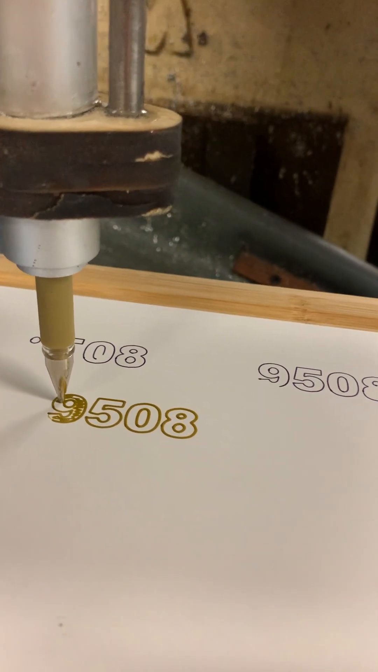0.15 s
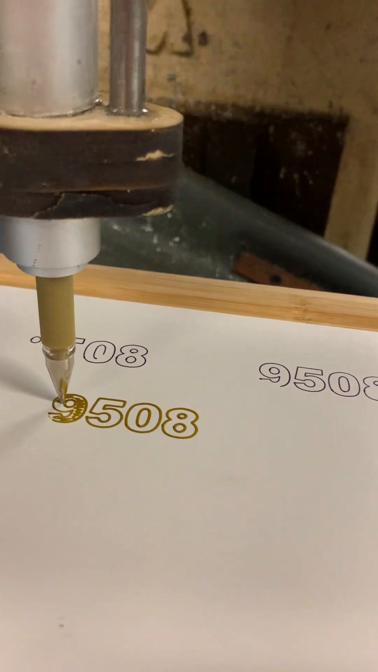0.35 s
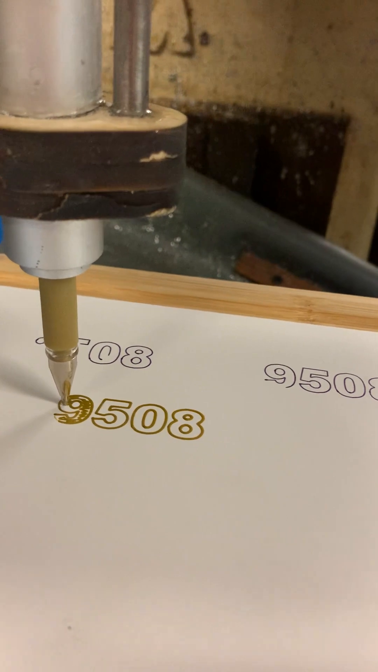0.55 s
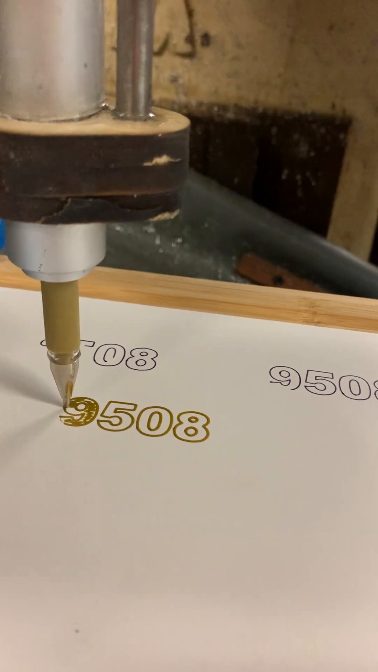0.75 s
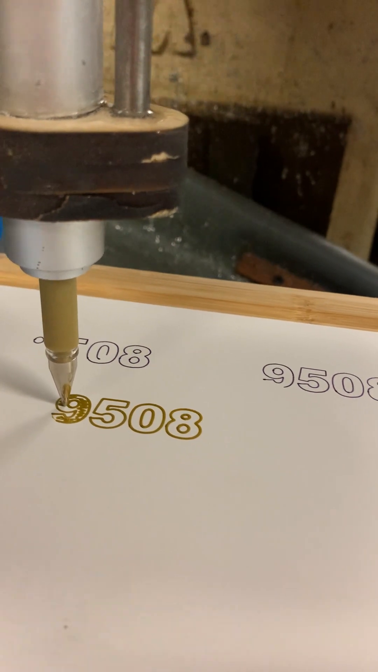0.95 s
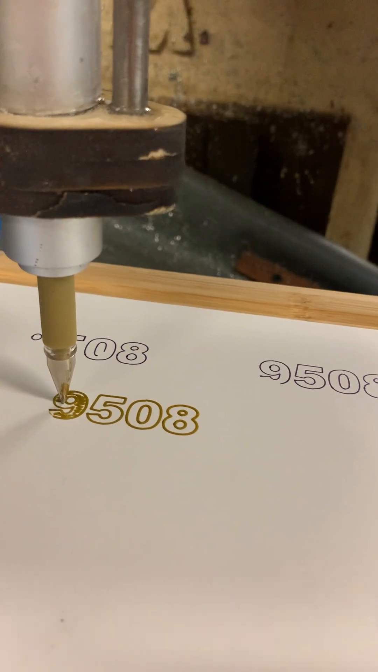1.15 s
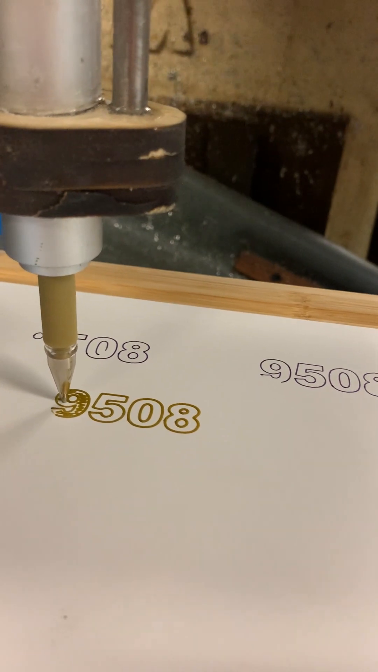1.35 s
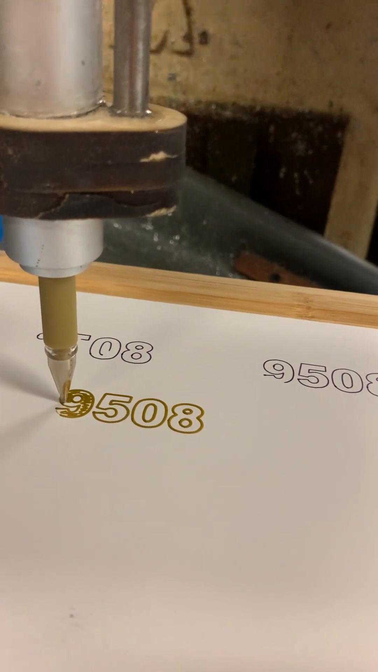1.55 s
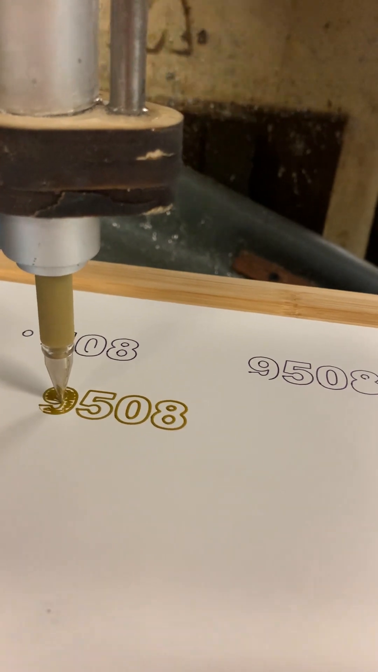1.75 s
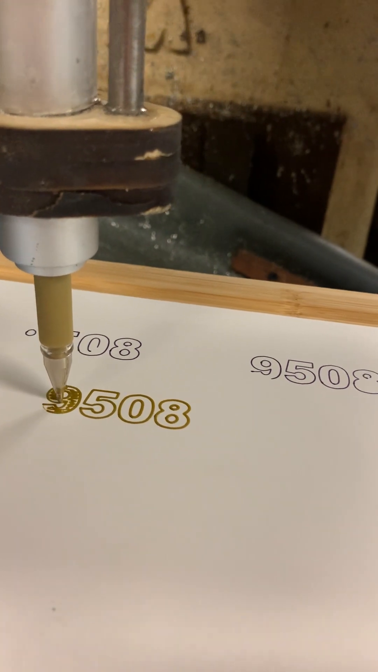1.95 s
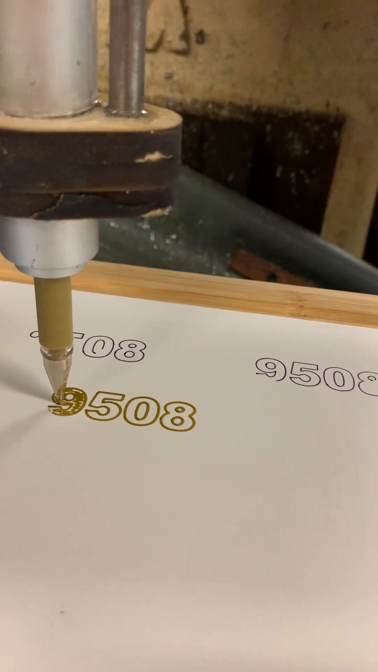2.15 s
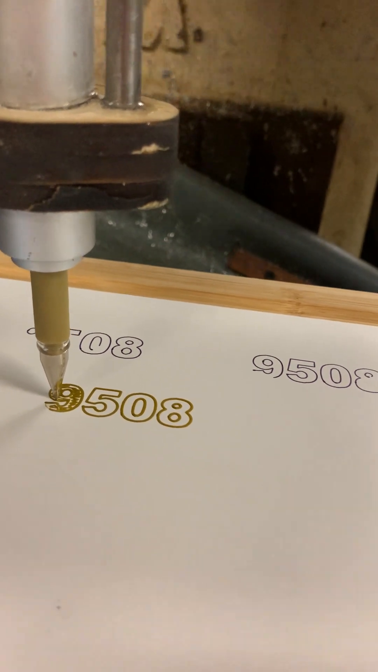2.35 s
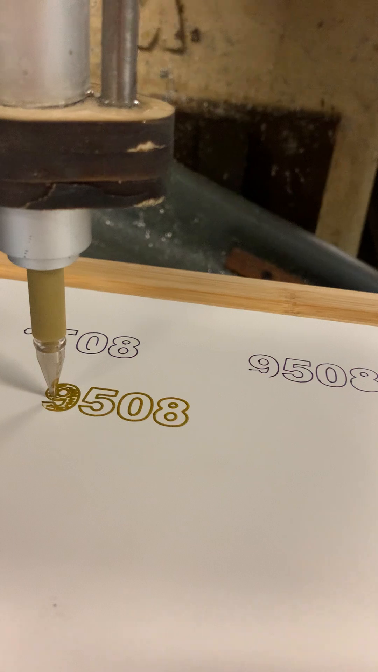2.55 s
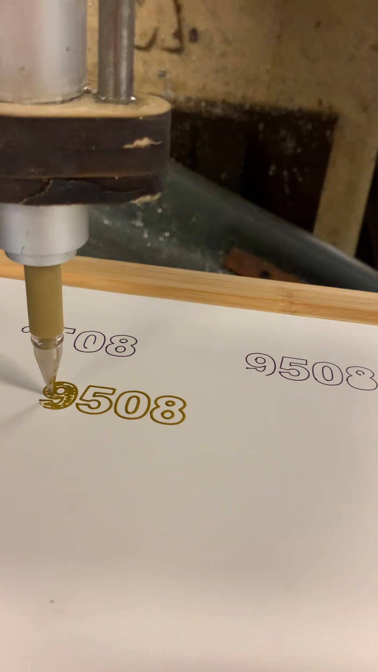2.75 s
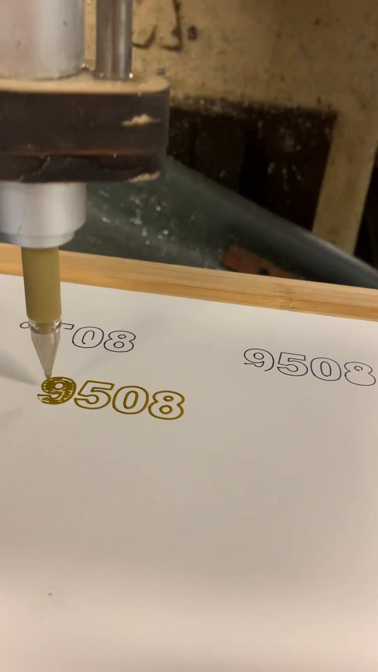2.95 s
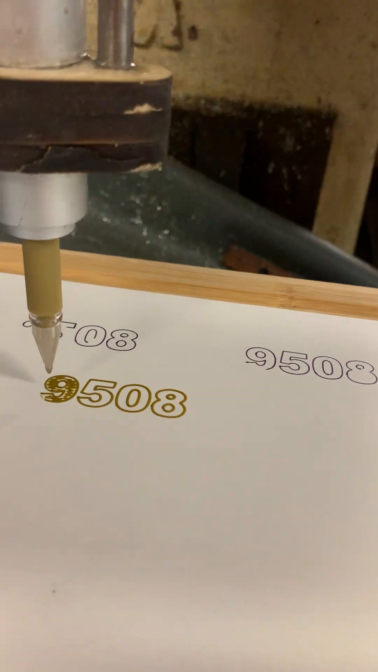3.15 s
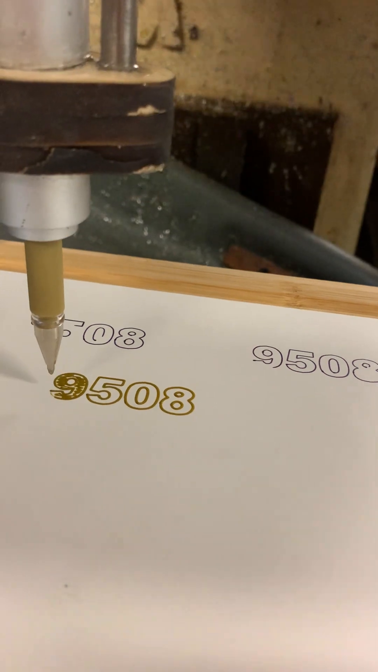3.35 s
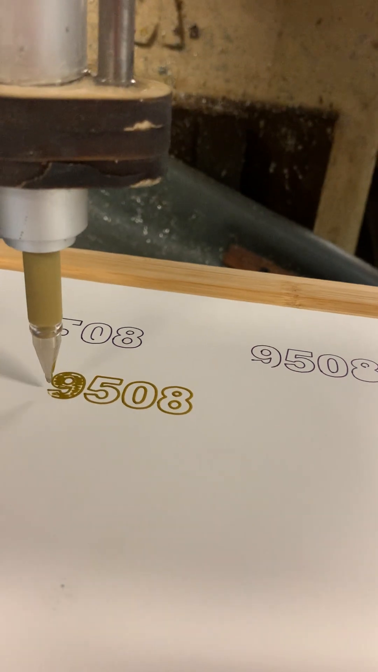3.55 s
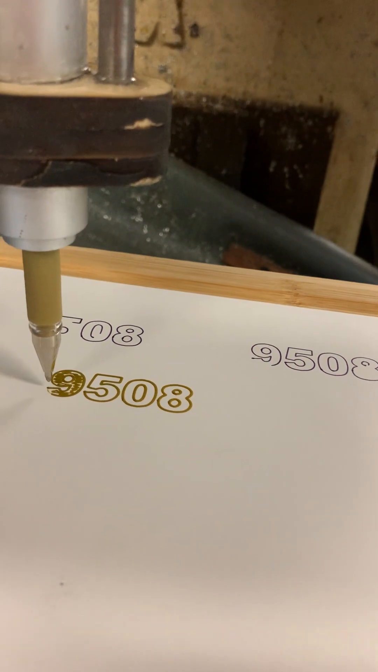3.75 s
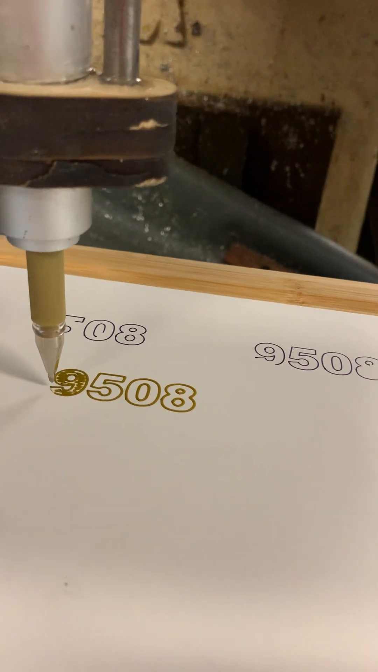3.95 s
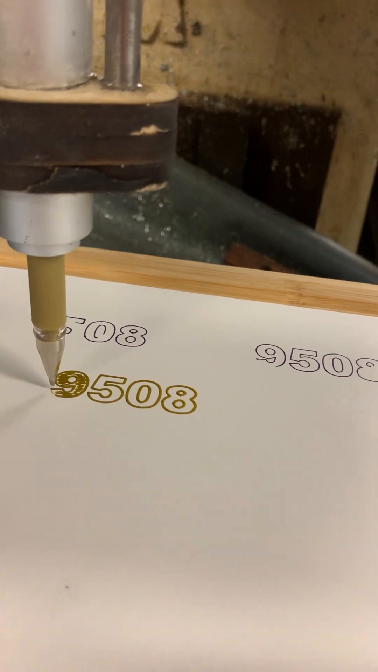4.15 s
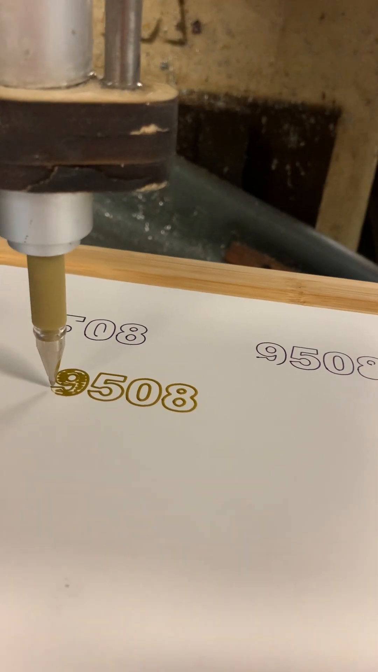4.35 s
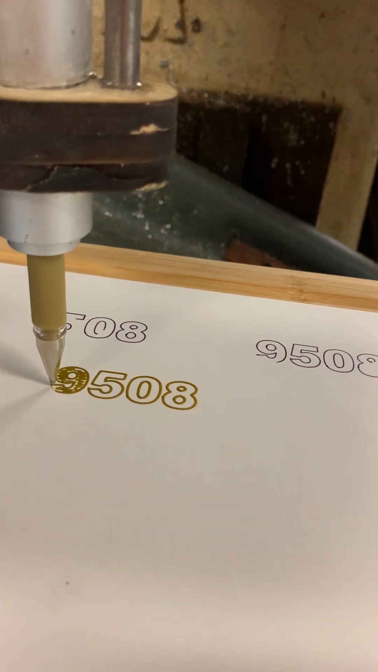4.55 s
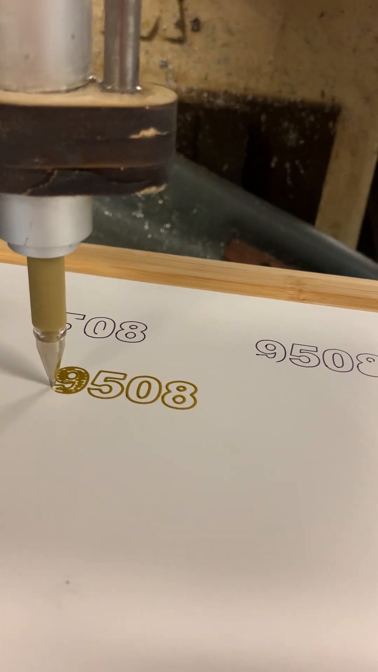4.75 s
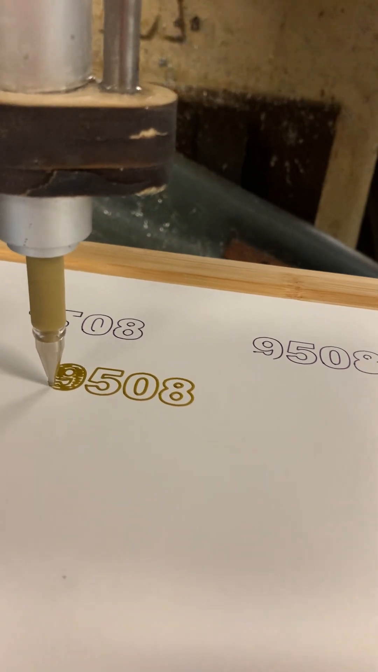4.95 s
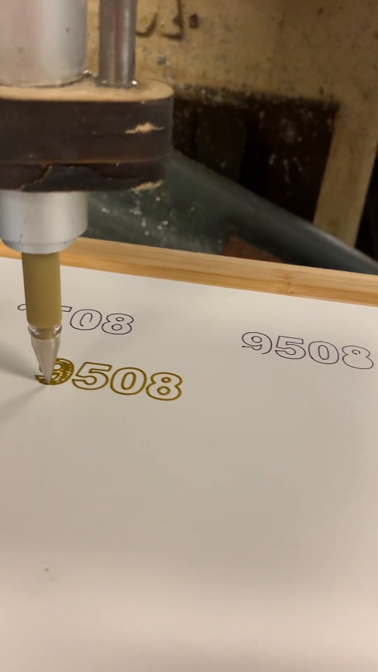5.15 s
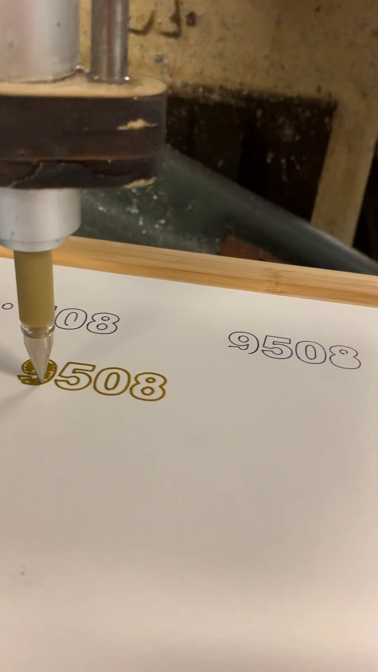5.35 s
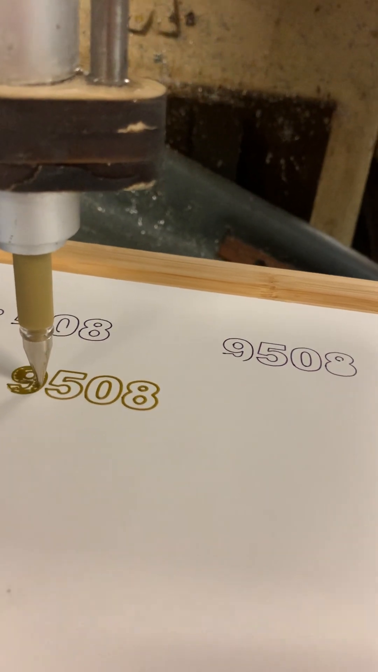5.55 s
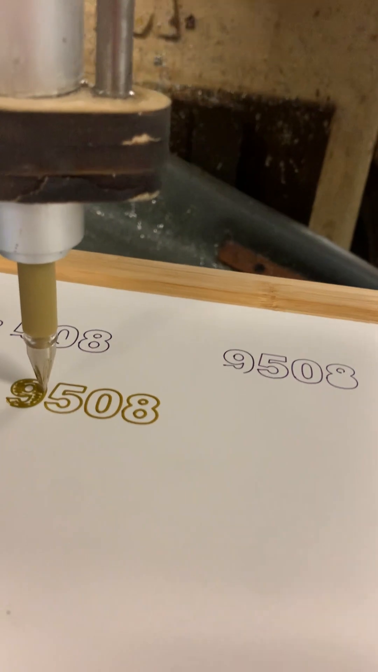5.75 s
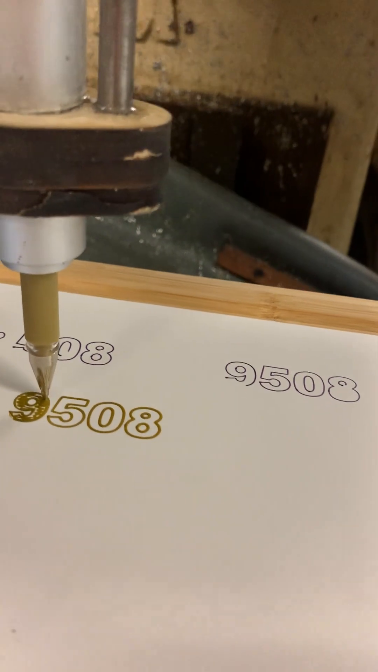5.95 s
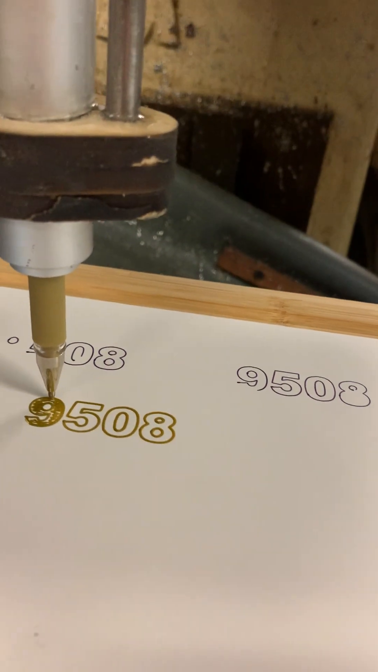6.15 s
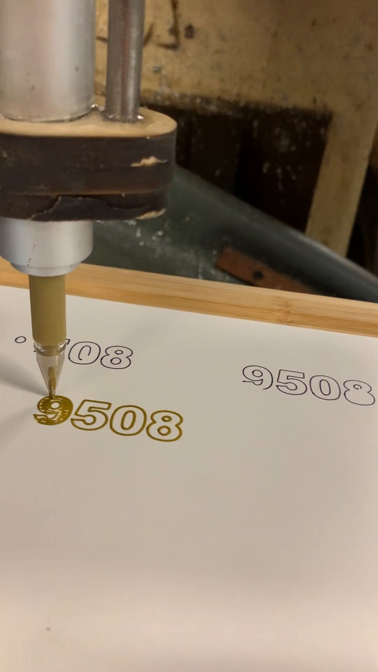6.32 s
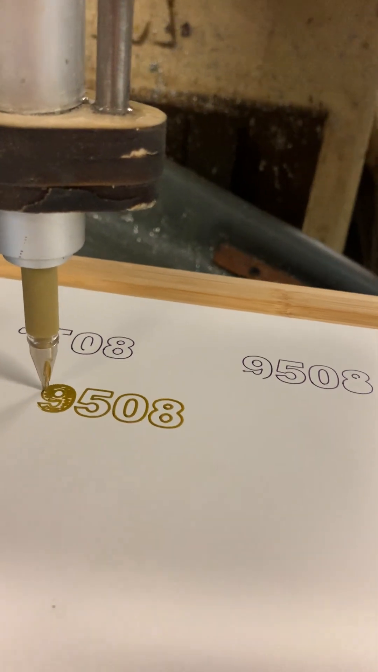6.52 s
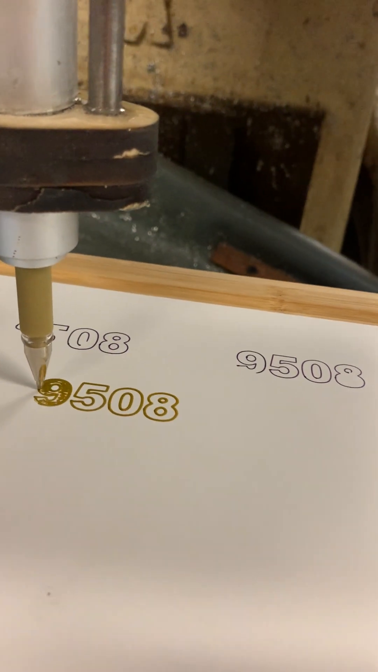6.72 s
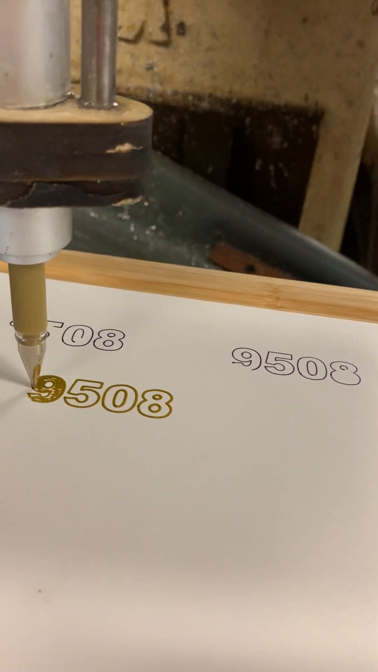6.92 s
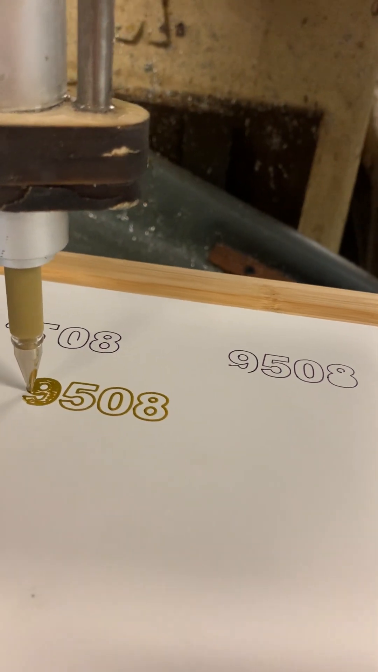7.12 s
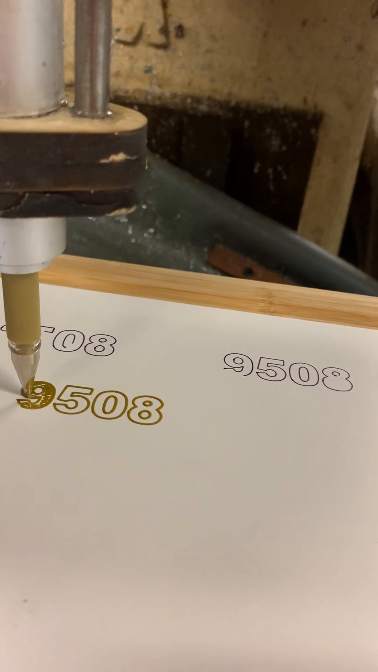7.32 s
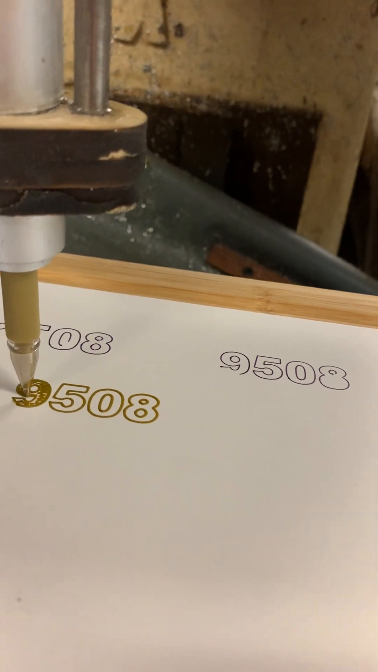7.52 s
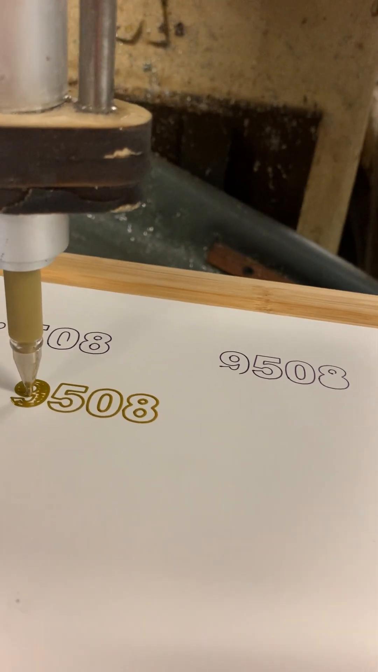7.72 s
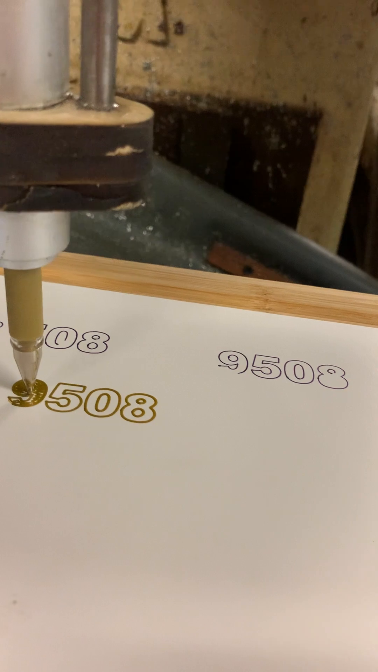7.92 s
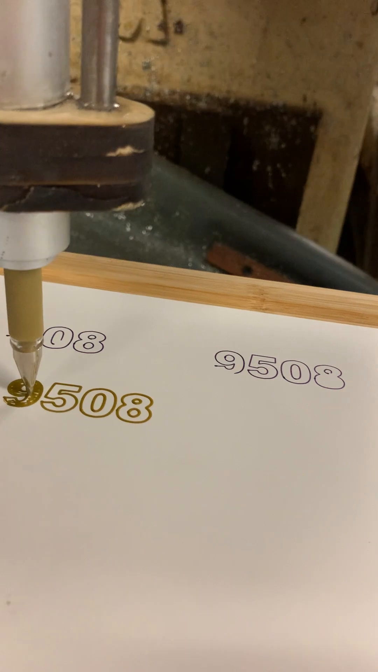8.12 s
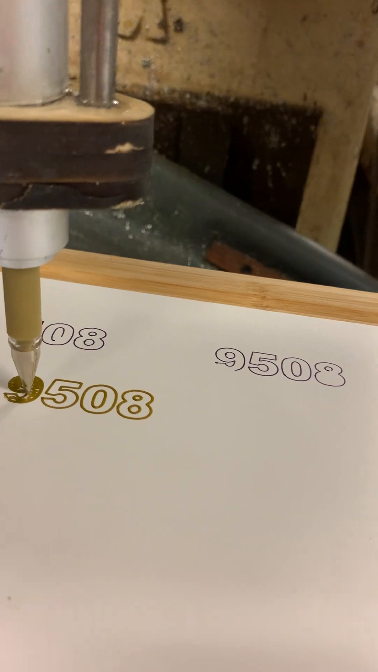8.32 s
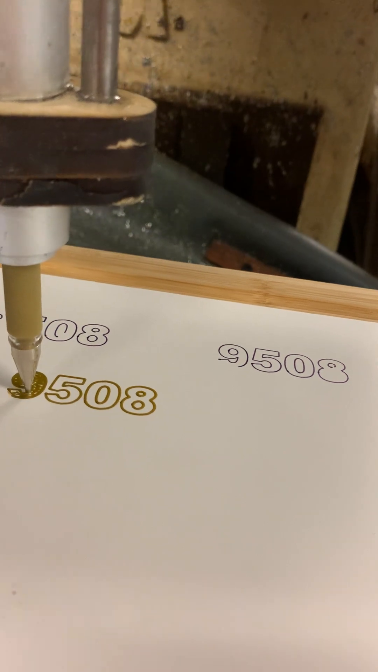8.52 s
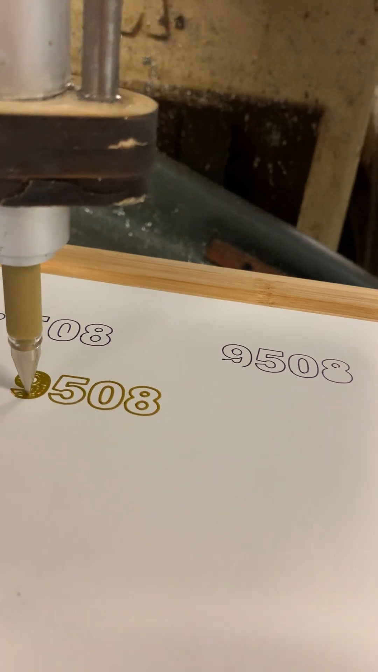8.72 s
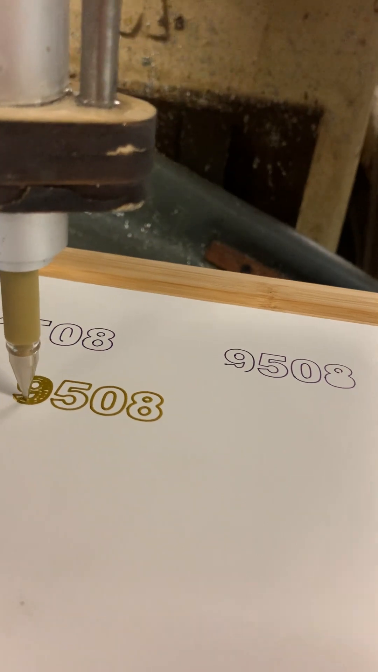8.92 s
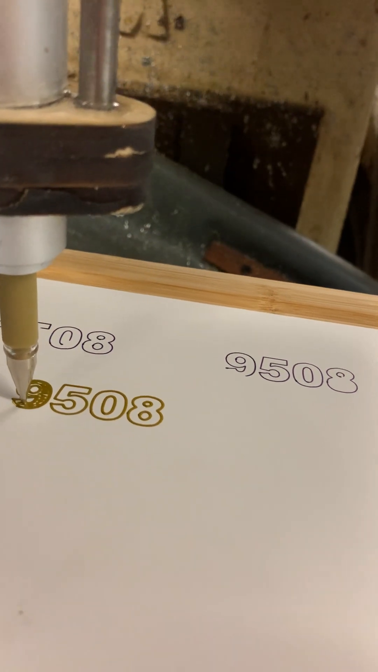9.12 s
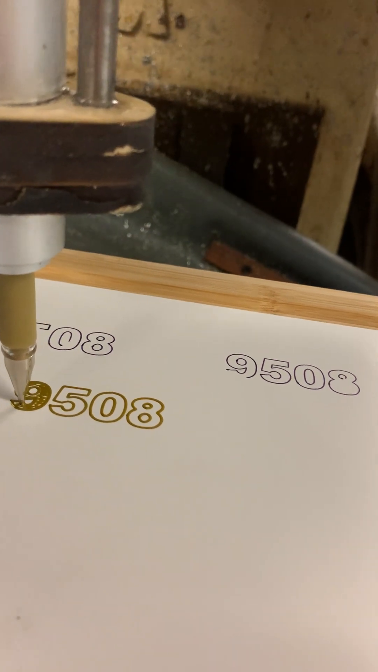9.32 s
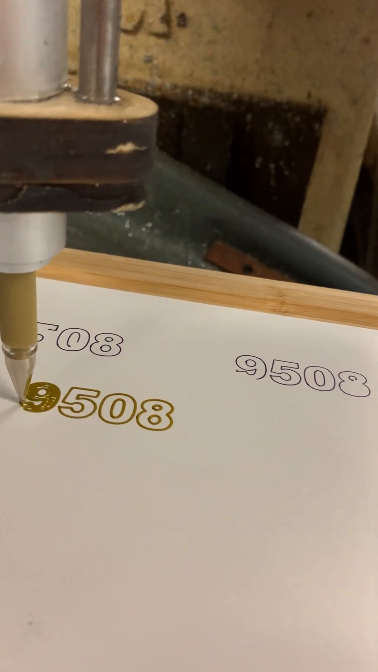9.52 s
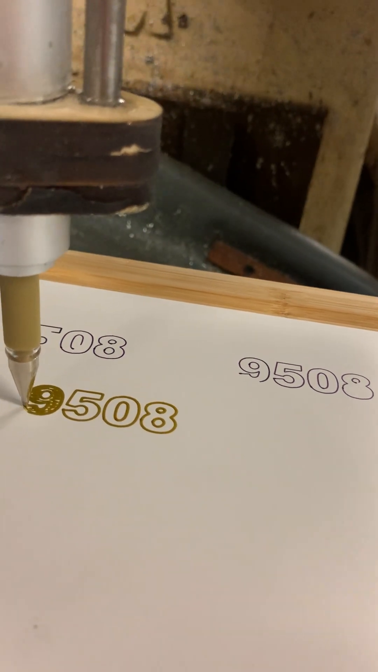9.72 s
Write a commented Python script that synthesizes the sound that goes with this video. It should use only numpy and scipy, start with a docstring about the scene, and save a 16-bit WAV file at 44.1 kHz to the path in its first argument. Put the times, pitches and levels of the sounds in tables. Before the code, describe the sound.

Over a rumbling fan, a small drawing machine whines faintly, clicks and knocks, rasping twice as its pen lifts and drops.

```python
"""A small pen plotter fills in digits on a board, heard from close by in a quiet workshop.
Its motors whine faintly, the pen hisses as it rubs, the carriage knocks when it reverses,
fast moves shake the frame and the gearing ticks. The pen axis lifts and drops with two loud rasps
in its metal guide. A fan rumbles all along. Two microphone ports hear it out of phase."""
import sys
import numpy as np
from scipy import signal
from scipy.fft import rfft, irfft
from scipy.io import wavfile

SR = 44100
rng = np.random.default_rng(int(sys.argv[2]) if len(sys.argv) > 2 else 0)


def unload_audio(sound):
    """Save the sound as a 16-bit wav file, at the path given as the first command line argument."""
    columns = np.transpose(np.atleast_2d(sound))
    # keep every value between -1 and 1, then stretch to whole-number steps
    steps = np.round(np.clip(columns, -1, 1) * 32767)
    wavfile.write(sys.argv[1], SR, steps.astype(np.int16))


N = 431277
TIME = np.arange(N) / SR
HZ = np.maximum(np.fft.rfftfreq(N, 1 / SR), 1)

# The pen axis sliding in its guide. Each row: start of full speed and hold in seconds, treble hiss in dB,
# lower and top hiss in dB above the treble, start in seconds and level in dB of the whine's surge.
SLIDES = [(2.868, 0.17, -38, -2.5, 1.8, 2.876, -43.5), (3.436, 0.14, -36.5, -5, -1.1, 3.42, -57)]
SLIDE_RISE, SLIDE_FALL = 3400, 960  # dB per second


def from_db(db):
    """Decibels to gain."""
    return 10 ** (np.asarray(db) / 20)


def rms_one(x):
    """Scale to rms 1."""
    return x / np.sqrt(np.mean(x ** 2) + 1e-20)


def in_time(rows):
    """One automation curve for each column after the time in seconds."""
    seconds, *columns = np.transpose(rows)
    return [np.interp(TIME, seconds, column) for column in columns]


def at_hz(points):
    """A curve across the spectrum, joining the points over log frequency."""
    hz, values = np.transpose(points)
    return np.interp(np.log(HZ), np.log(hz), values)


def swell(start, held, rise, fall):
    """Envelope in dB: rises to 0 at start, holds, then falls; slopes in dB per second."""
    t = TIME - start
    return np.minimum(0, np.minimum(rise * t, fall * (held - t)))


def drift(rate_hz):
    """Smooth random modulation with an rms of about 1: noise through two one-pole low-passes."""
    step, run_in = 40, 2000
    pole = np.exp(-2 * np.pi * rate_hz * step / SR)
    noise = rng.standard_normal(N // step + run_in + 2)
    slow = signal.lfilter([1], [1, -2 * pole, pole * pole], noise)[run_in:]
    return np.interp(np.arange(N) / step, np.arange(len(slow)), rms_one(slow))


def resonances(peaks, steep=2):
    """Magnitude spectrum of resonances that add in power; a higher steep narrows each peak."""
    powers = (from_db(2 * db) / (1 + ((HZ - hz) / (width / 2)) ** 2) ** steep for hz, width, db in peaks)
    return np.sqrt(sum(powers))


def stereo_noise(magnitude):
    """Noise coloured by a magnitude spectrum, partly shared between the two ports."""
    # How alike the ports sound. Each row: frequency in Hz, likeness from 0 to 1.
    likeness = [(40, .995), (100, 1), (260, 0.96), (430, 0.82), (600, 0.48), (800, 0.17), (1200, 0.33),
                (2000, 0.52), (2600, 0), (3500, 1), (4600, 0.97), (6500, 1)]
    alike = at_hz(likeness)
    mid, side = rfft(rng.standard_normal((2, N)))
    spectra = np.sqrt((1 + alike) / 2) * mid + np.sqrt((1 - alike) / 2) * side * [[1], [-1]]
    return irfft(magnitude * spectra, N)


def ring(force, hz, t60):
    """One struck mode: a sine that dies by 60 dB in t60 seconds."""
    decay, angle = from_db(-60 / (t60 * SR)), 2 * np.pi * hz / SR
    return signal.lfilter([0, np.sin(angle)], [1, -2 * decay * np.cos(angle), decay ** 2], force + 1e-18)


def burst(centre_hz, width_hz, attack_s, t60):
    """A short puff of band noise that dies away."""
    t = np.arange(round(.15 * SR)) / SR
    edges = [max(centre_hz - width_hz / 2, 100), min(centre_hz + width_hz / 2, .45 * SR)]
    bandpass = signal.butter(2, edges, "band", fs=SR, output="sos")
    band = signal.sosfilt(bandpass, rng.standard_normal(len(t)))
    return rms_one(band) * np.minimum(t / attack_s, 1) * from_db(-60 * t / t60)


def add(out, start, sound):
    """Mix a sound in at start seconds."""
    i = round(start * SR)
    out[..., i:i + sound.shape[-1]] += sound[..., :N - i]


def fan():
    """A bed of rumbling air with narrow hums of the fan housing, both wavering a little."""
    # Fan and room air. Each row: frequency in Hz, noise density in dB per Hz.
    air_spectrum = [(25, -92), (45, -68), (65, -57), (110, -60.5), (200, -60), (320, -68), (550, -71),
                    (1000, -79.5), (2100, -83), (2700, -89.5), (4200, -94), (6200, -101), (7300, -110),
                    (16000, -119)]
    # Housing resonances. Each row: frequency in Hz, width in Hz, rms level in dB.
    housing = [(79.5, 16.7, -42.5), (116, 13, -45.5), (165.5, 9.8, -59), (259, 9.8, -45), (332, 15, -57.5),
               (406.8, 10.6, -53.5), (471.5, 11, -59), (600, 14, -66.5), (645.3, 22, -57),
               (780.6, 6.9, -63), (880, 59, -57.5), (2270, 24, -69.5)]
    air = stereo_noise(from_db(at_hz(air_spectrum)) * np.sqrt(SR / 2)) * from_db(.5 * drift(1.45))
    # Turn each rms level into the height of its peak.
    peaks = [(hz, width, db + 10 * np.log10(2 * SR / (np.pi * width))) for hz, width, db in housing]
    hum = stereo_noise(resonances(peaks)) * from_db(drift(.98))
    return air + hum


def motors():
    """A rough, fluttering whine that surges with each slide, and a thin driver tone wrapped in fizz."""
    # Motor levels. Each row: time in seconds, then whine, driver tone and fizz in dB.
    motor_levels = [(0, -67, -90, -92), (.8, -64.5, -90, -92), (1.5, -65.5, -81, -90),
                    (1.75, -66, -71, -75), (2.05, -65, -85, -88), (2.1, -57.5, -83, -88),
                    (2.62, -63.5, -87, -87), (2.72, -62, -75, -75), (3.15, -66, -80, -84),
                    (3.38, -63, -86, -84), (3.7, -60.5, -73, -74), (4.5, -61, -75, -74),
                    (4.85, -63, -84, -84), (5.0, -68, -80, -72), (5.5, -66.5, -82, -76),
                    (5.73, -65, -88, -77), (5.78, -66, -70, -84), (6.8, -66, -78, -80),
                    (7.3, -66, -72.5, -80), (9.4, -68, -74, -82), (9.5, -60.5, -88, -92),
                    (9.78, -59, -80, -92)]
    whine_hz, whine_width_hz, tone_hz, fizz_width_hz = 3730, 100, 10316, 360
    sliding_db, surge_held_s = -52.5, .058
    whine_db, tone_db, fizz_db = in_time(motor_levels)
    for start, held, *_, surge_start, surge_db in SLIDES:
        whine_db = np.maximum(whine_db, sliding_db + swell(start, held, rise=1100, fall=270))
        whine_db = np.maximum(whine_db, surge_db + swell(surge_start, surge_held_s, rise=1100, fall=270))
    flat_band = 1 / np.sqrt(1 + (2 * (HZ - whine_hz) / whine_width_hz) ** 6)
    whine = rms_one(stereo_noise(flat_band)) * from_db(whine_db + 2 * drift(45))
    tone = np.sqrt(2) * np.sin(2 * np.pi * tone_hz * TIME) * from_db(tone_db + 2.2 * drift(12))
    fizz = rms_one(stereo_noise(resonances([(tone_hz, fizz_width_hz, 0)]))) * from_db(fizz_db)
    return whine + tone + fizz


def pen():
    """The pen rubs the board: soft, grainy friction hiss in three bands, louder in each stroke."""
    # Faint steady rubbing. Each row: time in seconds, treble hiss in dB,
    # lower and top hiss in dB above the treble.
    drag = [(0, -90, -3, 0), (1.9, -88, -3, -4), (2.25, -82, -3, -6), (2.7, -94, -3, -6),
            (3.7, -84, 2, -10), (4.1, -80, 2, -8), (4.27, -88, -3, -8), (4.42, -79, 2, -8),
            (4.53, -86, 0, -6), (4.7, -78, -3, -6), (4.86, -86, -3, -4), (4.9, -74, 3, 5),
            (5.2, -74.5, 5, 1), (5.55, -82, -1, -4), (6.2, -76, -7, -10), (6.8, -84, -3, -12),
            (7.6, -93, -3, -18), (8.6, -86, -3, -14), (9.3, -91, -3, -18), (9.78, -86, -3, -4)]
    # Pen strokes. Each row: start of full pressure and hold in seconds, treble hiss in dB,
    # lower and top hiss in dB above the treble.
    strokes = [(.075, 0.065, -68, 4, 3), (.55, 0.043, -69, 7, -4), (.872, 0.077, -69, 4, 1),
               (1.03, .02, -78, 11, -8), (1.375, 0.038, -65, 7, -4), (1.5, .01, -69, 1, -17),
               (1.635, 0.065, -60.5, 3.5, 1), (1.99, 0.027, -64, -4, -21), (2.082, 0.016, -77, 16.5, -20),
               (3.175, .06, -65.5, -1, -1), (3.408, .01, -69, -7, -6), (4.975, .03, -71, 0, -4),
               (5.19, 0.059, -76, 9, -4), (5.365, 0.14, -78, 0, 9), (5.46, .04, -76, 7, 0),
               (5.59, .06, -80, -5, 9), (5.78, 0.083, -82, -5, 9), (5.97, .03, -78, 13, -10),
               (6.03, 0.053, -68.5, 7, -6), (6.25, .03, -68, -4, -20), (6.445, 0.055, -65.5, -4, 3),
               (6.632, 0.056, -67.5, -8, -2), (7.597, .01, -73, 0, -25), (7.75, .02, -83, 12, -20),
               (7.945, .02, -82, -3, 7), (8.385, .04, -72, -10, 2), (9.432, 0.067, -67.5, 6, -4),
               (9.635, .01, -72, 3, 2), (9.716, .01, -70, -12, -9)]
    # Resonances of the rubbing, grouped as treble, lower and top.
    # Each row: frequency in Hz, width in Hz, relative level in dB.
    bands = [
        [(10100, 800, -2), (11400, 1000, 1), (12200, 800, 0)],
        [(4800, 1200, -1), (5800, 1100, 1), (7200, 1400, -2), (8400, 800, -1), (9150, 700, 1)],
        [(13100, 900, 4), (13800, 800, 3), (14800, 1000, -3), (15500, 600, -5)],
    ]
    drag_db, drag_lower_db, drag_top_db = in_time(drag)
    levels_db = np.array([drag_db, drag_db + drag_lower_db, drag_db + drag_top_db])
    for start, held, treble_db, lower_db, top_db in strokes:
        stroke_db = treble_db + swell(start, held, rise=760, fall=250)
        levels_db = np.maximum(levels_db, stroke_db + [[0], [lower_db], [top_db]])
    grain_db = 2.1 * drift(140)  # common to all bands; each also flickers on its own
    hisses = [rms_one(stereo_noise(resonances(band))) for band in bands]
    return sum(hiss * from_db(db + grain_db + 2.4 * drift(29)) for db, hiss in zip(levels_db, hisses))


def carriage_knocks():
    """The carriage takes up its play at a reversal: a rough contact rings it, with a crack and a clack."""
    # Reversals. Each row: start in seconds, level in dB, tilt toward the upper ring in dB, crack and
    # thud offsets in dB, pitch of the lower ring in Hz, which moves with the carriage's place.
    knocks = [(0.5057, -44, 10, -28, -14, 1900), (0.5245, -38.5, 4, -12.5, -5, 2000),
              (0.6896, -47, -1, -23, -12, 2300), (0.894, -47, -6, -23, -4, 2350),
              (1.0302, -42, -7, -9.5, -7, 2150), (1.052, -51, 6, -20, -15, 2200),
              (1.068, -50, 5, -18, -15, 2150), (1.3318, -42, -3, -20, -8, 2200),
              (1.3568, -43.5, 3, -5, 3, 2030), (1.3723, -39, 12, -7.5, -3, 2140),
              (1.73, -42.5, -9, -8.5, -1, 2100), (2.0804, -51.5, 9, -1, -3, 1500),
              (3.157, -43.5, 12, -10, 2, 2200), (3.171, -44.5, 12, -16, 4, 2000),
              (3.202, -52, -4, -14, 13, 1800), (3.215, -52, -4, -14, 12, 2100),
              (3.3245, -46, 3, -21, -17, 2080), (5.163, -42.5, -10, -23, -10, 2150),
              (5.4428, -38.5, -6, -22, -6, 2120), (5.457, -44, -3, -11, -12, 2300),
              (5.4694, -52, -4, -5, -5, 2300), (6.025, -38.5, 11, -15, -12, 2140),
              (6.205, -45.5, -6, -11, -2, 2350), (6.5555, -47, -6, -12, -15, 1900),
              (7.577, -40.5, 13, -24, -17, 2210), (7.601, -48, 17, -26, -17, 2210),
              (7.736, -49.5, -3, -8, 1, 2100), (8.65, -45, -6, -18, -8, 2100),
              (8.9366, -49, -8, -12, -11, 2170), (9.1038, -49, -18, -26, -8, 2100),
              (9.4239, -43.5, 3, -11, -5, 2150), (9.4312, -44.5, 5, -14, 9, 1700),
              (9.4368, -40, 12, -17, -2, 1900)]
    # The carriage's other modes, struck with random strength.
    # Each row: frequency in Hz, relative level in dB, time to fall 60 dB in seconds.
    other_modes = [(1545, -7.5, 0.044), (1864, -12, 0.068), (2380, -25, 0.059), (3190, -12, 0.033),
                   (3660, -15.5, 0.14), (8150, -39, 0.074)]
    contact_attack_s, contact_decay_s = .003, .004
    out = np.zeros((2, N))
    t = np.arange(round(.25 * SR)) / SR
    contact_shape = np.exp(-t / contact_decay_s) * np.minimum(t / contact_attack_s, 1)
    for start, level_db, tilt_db, crack_db, thud_db, lower_hz in knocks:
        contact = rng.standard_normal((2, len(t))) * contact_shape
        contact[1] = .85 * contact[0] + .5 * contact[1]  # the far port hears more reflections
        modes = [(2297, 1 + tilt_db / 2, .13),  # upper ring
                 (lower_hz, -1 - tilt_db / 2, .071),  # lower ring
                 (1324, 3 + thud_db, .045)]  # thud
        modes += [(hz, db + rng.normal(0, 3), t60) for hz, db, t60 in other_modes]
        for hz, db, t60 in modes:
            ringing = ring(contact, hz, t60)
            add(out, start, from_db(level_db + db) * ringing / np.abs(ringing).max())
        crack = burst(4700, 3700, .0013, .06) + from_db(-.5) * burst(4100, 5100, .0032, .18)
        crack *= from_db(level_db + crack_db + 1)
        clack_db = -53 + .35 * (level_db + 42)  # only partly follows the knock's strength
        clack = from_db(clack_db) * burst(3000, 2800, .005, .065)
        add(out, start, crack + clack)
    return out


def frame_shakes():
    """Fast moves rattle the frame's resonances, and the lift motor growls just behind."""
    # Fast moves. Each row: start of full strength and hold in seconds, rattle and growl in dB.
    shakes = [(1.65, 0.077, -44.5, -41), (2.94, 0.054, -35, -34), (3.165, 0.052, -46.5, -37),
              (3.48, 0.058, -39, -31.5)]
    # Frame resonances. Each row: frequency in Hz, width in Hz, relative level in dB.
    frame_modes = [(584, 110, -1.5), (655, 80, -1), (912, 34, -0.5), (1065, 34, -4.5), (1370, 71, -5.5),
                   (1583, 92, -5), (1930, 91, -7), (2140, 85, -5), (2610, 54, -8), (3100, 180, -13)]
    # The lift motor's low growl. Each row: frequency in Hz, width in Hz, relative level in dB.
    growl_modes = [(191, 36, 4.5), (234, 33, -21), (292, 52, -1.5), (438, 135, -7)]
    growl_lag_s = .016
    rattle_gain, growl_gain = np.zeros((2, N))
    for start, held, rattle_db, growl_db in shakes:
        rattle_gain += from_db(rattle_db + swell(start, held, rise=206, fall=260))
        growl_gain += from_db(growl_db + swell(start + growl_lag_s, held, rise=220, fall=220))
    rattle = rms_one(stereo_noise(resonances(frame_modes, steep=1))) * from_db(1.1 * drift(60))
    growl = rms_one(stereo_noise(resonances(growl_modes)))
    return rattle_gain * rattle + growl_gain * growl


def gear_ticks():
    """Bright little clicks: the ring of a gear inside a broad snap."""
    # Ticks of the gearing. Each row: start in seconds, level in dB,
    # lower and top skirt offsets in dB, pitch of the ring in Hz.
    ticks = [(2.1969, -62, 2, 5, 10400), (2.2807, -56, -13, -15, 10300), (2.3206, -65, -11, -13, 10400),
             (2.3625, -57, -11, -13, 9800), (2.4034, -58, -11, -13, 10300), (2.4394, -54, -12, -14, 9900),
             (2.698, -45, -27, -29, 10500), (2.7387, -59, -15, -17, 10300), (2.7811, -55, -17, -19, 10200),
             (3.4072, -52, -4, -4, 12100), (3.744, -66, 6, -10, 8500), (3.7559, -61, -6, -8, 11500),
             (3.7804, -57, 3, -6, 7500), (3.8014, -60, 5, -4, 8300), (3.8654, -60, 1, -10, 8800),
             (3.908, -64, 0, -8, 10500), (3.9504, -55.5, 1, -8, 10500), (3.9908, -60, -8, -8, 10200),
             (4.0354, -60, -8, -10, 9400), (4.055, -61, -20, -20, 12300), (4.076, -61, -20, -20, 11900),
             (4.137, -38, -15, -15, 12800), (4.1579, -37, -22, -22, 11500), (4.179, -36.5, -29, -31, 10000),
             (4.339, -45, -27, -22, 10500), (4.379, -43, -15, -17, 10600), (4.4922, -58, -14, -6, 12200),
             (4.575, -42.5, -17, -14, 9000), (4.614, -40, -17, -12, 10500), (4.658, -34.5, -27, -27, 10300),
             (4.6954, -33, -19, -12, 13200), (4.718, -32, -24, -20, 10500), (4.7383, -35, -18, -17, 11000),
             (4.7564, -53, -12, -12, 12000), (4.794, -47.5, -2, -6, 12000), (4.97, -58, -8, -8, 11500),
             (5.875, -66, -10, 3, 13500), (6.628, -62, -15, -6, 11500), (6.674, -62, -15, -4, 12500),
             (6.695, -62, -15, -4, 12800), (7.9494, -67, -6, -8, 10500), (9.2354, -70, 3, 3, 14000)]
    out = np.zeros(N)
    for start, level_db, lower_db, top_db, ring_hz in ticks:
        snap = from_db(-7) * burst(11000, 5200, .002, .026)
        ping = from_db(-3) * burst(ring_hz, 1200, .002, .041)
        lower = from_db(lower_db) * burst(7000, 3500, .002, .038)
        top = from_db(top_db) * burst(15000, 3000, .002, .035)
        reflections = from_db(-23) * burst(10600, 7000, .0043, .28)
        add(out, start, from_db(level_db) * (snap + ping + lower + top + reflections))
    return out


def guide_rasp(modes, window):
    """Friction noise rings the guide's resonances, each swelling and fading on its own; rms 1."""
    stereo_spread, wander_db = .25, 4
    out = 0
    for hz, width, db in modes:
        mid, side = rng.standard_normal((2, window.stop - window.start))
        friction = mid + stereo_spread * side * [[1], [-1]]
        pole = np.exp(-np.pi * width / SR)
        feedback = [1, -2 * pole * np.cos(2 * np.pi * hz / SR), pole ** 2]
        ringing = signal.lfilter([1 - pole ** 2, 0, pole ** 2 - 1], feedback, friction)
        out += ringing * from_db(db + wander_db * drift(7)[window])
    return rms_one(out)


def brake_squeal(start, held, hiss_db):
    """A narrow, noisy squeal that sinks and grows as the axis brakes."""
    end_hz, glide_hz_per_s = 10500, 20000
    stop = start + held
    hz = end_hz + glide_hz_per_s * np.clip(stop - TIME, 0, held)
    tone = np.sqrt(2) * np.sin(2 * np.pi * np.cumsum(hz) / SR)
    crescendo_db = swell(stop, 0, rise=140, fall=SLIDE_FALL)
    gate_db = swell(start, held, SLIDE_RISE, SLIDE_FALL) / 2
    return from_db(hiss_db - 5 + crescendo_db + gate_db) * drift(120) * tone


def axis_slides():
    """The pen axis rasps along its metal guide, thinning as it goes, then squeals and coasts."""
    # The guide's resonances in three bands. Each row: frequency in Hz, width in Hz, relative level in dB.
    treble_modes = [(9450, 200, -6), (9890, 50, 4), (10010, 40, 1), (10250, 150, -4), (10636, 45, 3),
                    (11000, 250, -6), (11430, 250, -5), (11900, 250, -4), (12500, 300, -4)]
    lower_modes = [(4600, 400, -5), (5250, 300, -11), (5850, 400, -9), (6800, 400, -2), (7283, 40, 2),
                   (7628, 35, 8), (8050, 300, 2), (8800, 600, -1)]
    top_modes = [(13100, 400, -5), (13750, 500, -3), (14350, 300, -4), (14870, 60, 2), (15150, 300, -4),
                 (15495, 60, 3)]
    lower_sag, top_sag = 33, 40  # dB per second of sliding
    out, length = np.zeros((2, N)), SR // 2
    for start, held, treble_db, lower_db, top_db, *_ in SLIDES:
        drive_db = swell(start, held, SLIDE_RISE, SLIDE_FALL)
        coast_db = -11.5 + swell(start, held, SLIDE_RISE, fall=250)
        hiss_db = treble_db + np.maximum(drive_db, coast_db) + .82 * drift(140)
        out += brake_squeal(start, held, treble_db)
        sliding_s = np.clip(TIME - start, 0, held)
        first = round(start * SR) - length // 8  # leave room for the attack
        window = slice(first, first + length)
        bands = [(treble_modes, hiss_db),
                 (lower_modes, hiss_db + lower_db - lower_sag * sliding_s),
                 (top_modes, hiss_db + top_db - top_sag * sliding_s)]
        for modes, level_db in bands:
            out[:, window] += from_db(level_db[window]) * guide_rasp(modes, window)
    return out


def scene():
    """The plotter's whine, friction and impacts over the bed of the fan."""
    return fan() + motors() + axis_slides() + pen() + frame_shakes() + carriage_knocks() + gear_ticks()


def record(dry):
    """Two microphone ports differ in phase, more so with pitch, and a little in colour; the top is cut."""
    # Phase between the ports. Each row: frequency in Hz, lead of the left in half turns.
    port_phase = [(0, 0), (1400, .15), (2800, .45), (3700, .45), (4750, 1), (6800, 2), (8950, 3),
                  (11050, 4), (13150, 5), (15300, 6), (17400, 7)]
    # Balance of the ports. Each row: frequency in Hz, left above right in dB.
    port_balance = [(60, .5), (120, .5), (220, 1.5), (320, .5), (520, -1.5), (840, 0), (1400, .5),
                    (2200, -1.5), (2800, 0), (3600, .5), (4500, 0)]
    cutoff_hz = 15950
    half_turns = np.interp(HZ, *np.transpose(port_phase))
    # Each port takes half of the offset, in opposite directions.
    left = from_db(at_hz(port_balance) / 2) * np.exp(.5j * np.pi * half_turns)
    ports = irfft(rfft(dry) * [left, 1 / left], N)
    return signal.sosfilt(signal.cheby2(24, 55, cutoff_hz, fs=SR, output="sos"), ports)


dry = scene()
out = record(dry)
unload_audio(out)
```